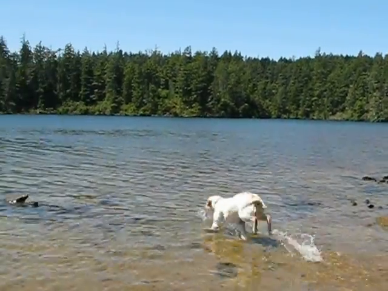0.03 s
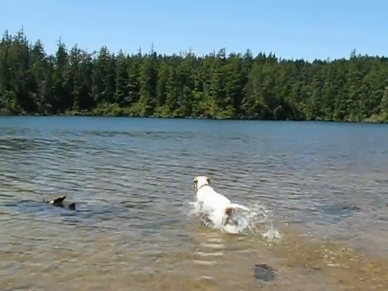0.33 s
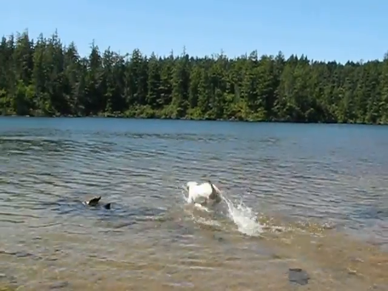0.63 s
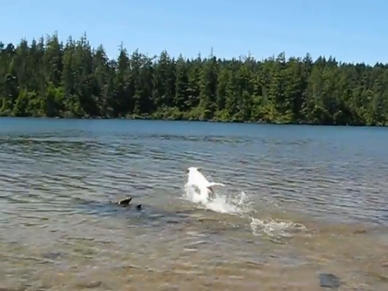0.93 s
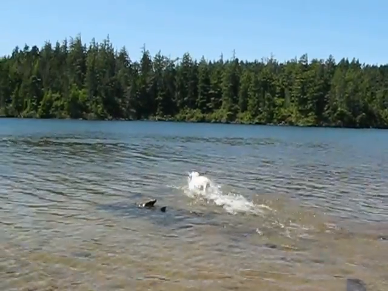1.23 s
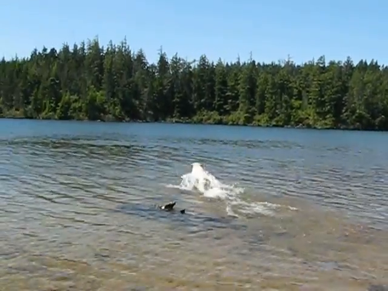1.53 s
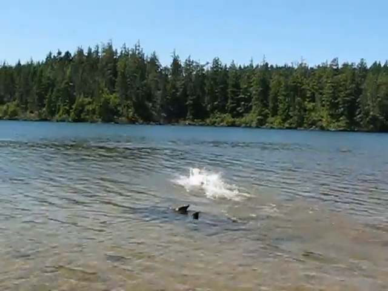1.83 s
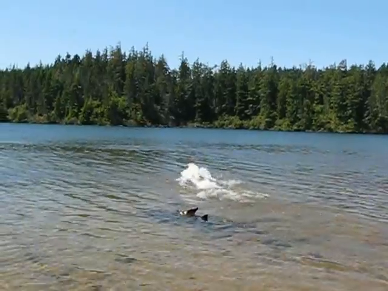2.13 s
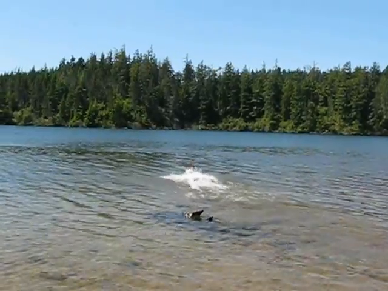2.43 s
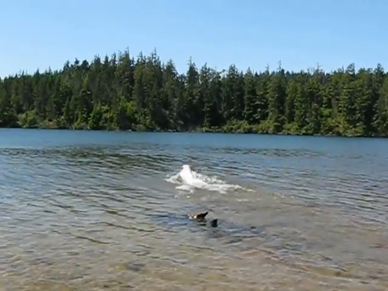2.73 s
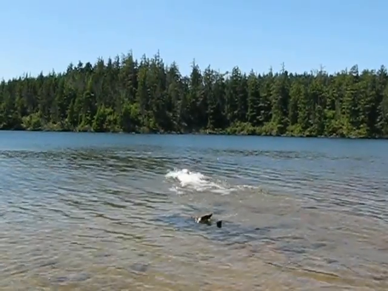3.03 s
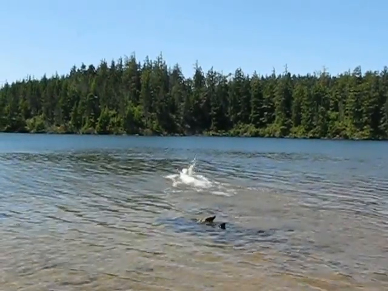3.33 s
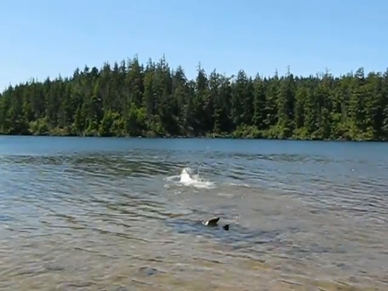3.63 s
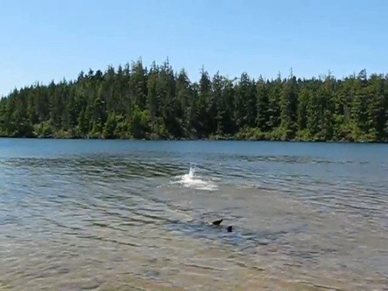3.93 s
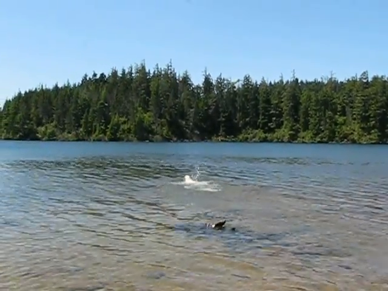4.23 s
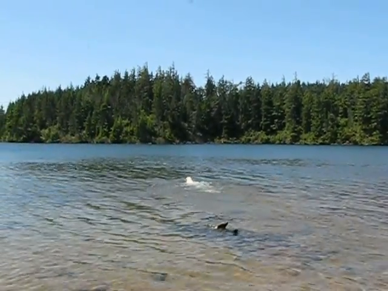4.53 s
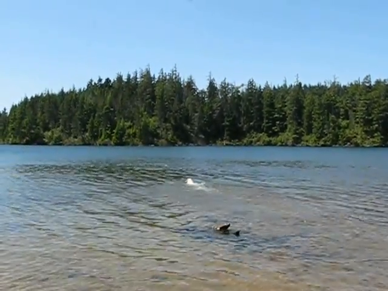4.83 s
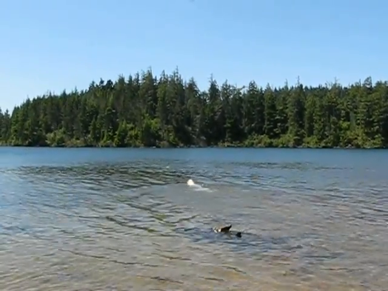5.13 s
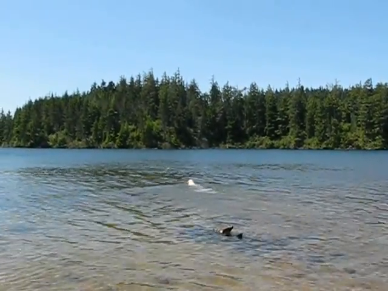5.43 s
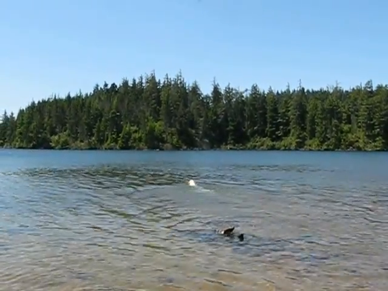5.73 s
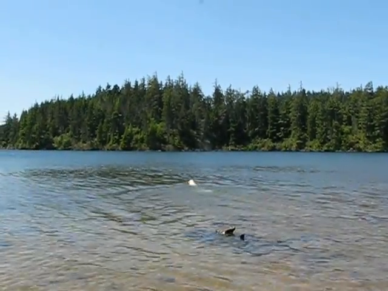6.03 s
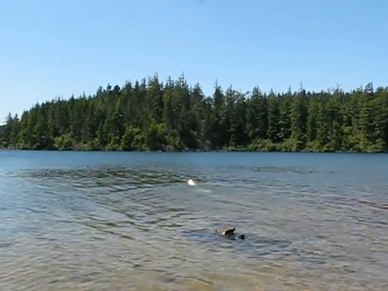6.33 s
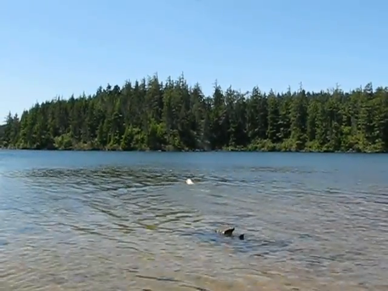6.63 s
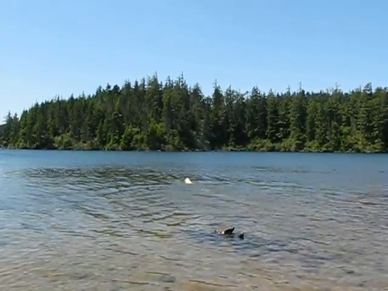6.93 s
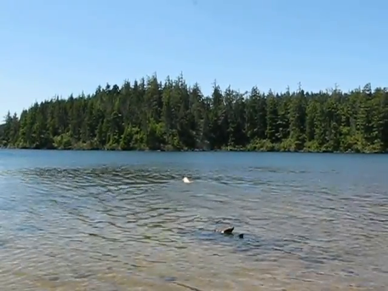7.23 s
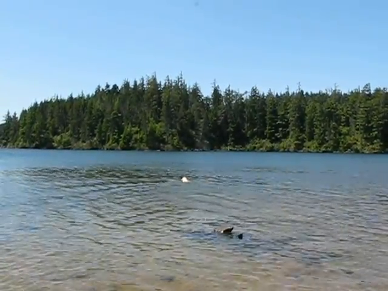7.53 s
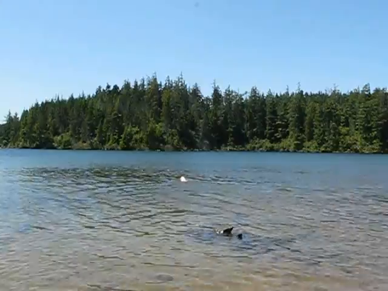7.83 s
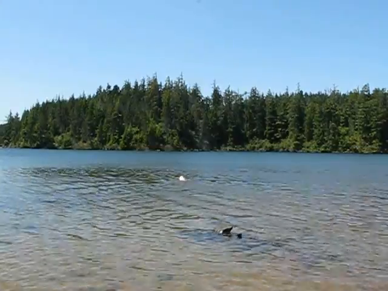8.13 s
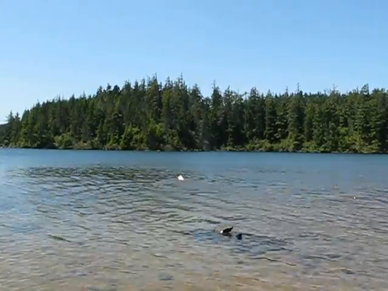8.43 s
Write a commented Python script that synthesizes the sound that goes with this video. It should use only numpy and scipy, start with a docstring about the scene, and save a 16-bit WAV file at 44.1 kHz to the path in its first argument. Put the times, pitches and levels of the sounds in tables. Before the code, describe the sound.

From the start, a dog gallops through shallow lake water close by: quick, sharp splashes, hollow gulps from its plunging legs and spray pattering back down. These are loudest and densest in the first two seconds. A few low gusts buffet the microphone until about 2.5 seconds, over a light steady rumble. From about 2 to 4 seconds the splashes become sparser and duller, with more churning and sloshing as the dog moves deeper and farther off. Some last small splashes and drips follow, and the dog fades out by about 5 seconds. Wind hisses smoothly in the trees throughout. A faint, low engine drone from far away wavers underneath and is more noticeable from 4 seconds on. Until the end at about 8.5 seconds, wind and engine continue, with a faint fizz and scattered ticks of ripples at the shore. The space is open, without echo.

```python
"""A dog runs into a lake

A dog gallops into the shallows, wades deeper and swims away. Each leg traps air that resonates with
a gulp, churns the water and flings up spray, which rains back as tiny bubbles, duller with distance.
Wind hisses in the forest and buffets the microphone; a far engine drones; ripples tick at the shore."""
import sys
import numpy as np
from scipy import signal
from scipy.io import wavfile

SR = 44100
rng = np.random.default_rng(int(sys.argv[2]) if len(sys.argv) > 2 else 0)


def pcm_store(signal):
    """Save signal as 16-bit PCM."""
    levels = np.round(np.clip(np.atleast_2d(signal), -1, 1) * 32767)
    wavfile.write(sys.argv[1], SR, levels.astype(np.int16).T)


N = 378641

# air cavities punched by the legs: t/s, duration/s, relative level/dB, f/Hz
PLUNGES = [(0.08, 0.022, -27.5, 565), (0.159, 0.019, -28.5, 473), (0.221, .007, -25, 470),
           (0.23, 0.01, -15.5, 510), (0.261, .0034, -17, 634), (0.395, .0085, -23, 414),
           (0.506, .009, -17, 390), (0.532, .0077, -23.5, 456), (0.595, 0.0029, -14.5, 410),
           (0.64, .012, -24, 605), (0.65, .008, -19.5, 610), (0.66, 0.009, -15, 420),
           (.686, .008, -26, 520), (0.801, 0.023, -21.5, 730), (0.829, .01, -18, 427),
           (0.859, 0.0097, -19.5, 450), (0.881, 0.015, -18, 580), (.903, 0.015, -24.5, 505),
           (0.983, 0.022, -18.5, 462), (1.021, 0.025, -29, 510), (1.205, 0.0083, -22.5, 406),
           (1.272, 0.022, -26, 436), (1.329, 0.012, -23, 640), (1.348, 0.036, -28, 187),
           (1.386, 0.025, -25, 350), (1.412, .028, -21.5, 440), (1.45, .028, -21.5, 610),
           (1.494, 0.039, -26.5, 456), (1.731, 0.014, -24, 400), (1.776, 0.017, -19, 550),
           (1.803, 0.017, -20.5, 450), (1.833, 0.035, -29, 620), (1.866, 0.0181, -27.5, 427),
           (1.921, .025, -22.5, 485), (1.962, 0.038, -25, 545), (2.07, .07, -28.5, 470),
           (2.245, 0.056, -30.5, 540), (2.483, 0.035, -27, 470), (2.551, .026, -21, 560),
           (2.89, 0.056, -29, 420), (2.956, 0.027, -34, 560), (3, .025, -29, 580), (3.036, .035, -29, 700),
           (3.179, .0072, -23, 670), (3.279, .02, -23, 400), (3.292, 0.013, -25, 580),
           (3.352, .008, -28.5, 487), (3.904, 0.0032, -18, 426), (3.914, .005, -17.5, 420),
           (3.92, .009, -30, 580)]
# spectrum of the bubbles made by falling drops: f/Hz, relative density level/dB
SPRAY_SPECTRUM = [(700, -5), (1000, 1.5), (1400, 1.5), (1900, 0.5), (2800, 2.5), (3600, -3.5), (4800, -4),
                  (6500, -10.5)]
FULL_PLUNGE_S = 0.022   # a plunge this long moves a full load of water


def from_db(db):
    """Amplitude ratio of a level in decibels."""
    return 10 ** (np.asarray(db) / 20)


def unit_rms(x):
    """Normalisation to an rms of 1."""
    return x / np.sqrt(np.mean(x ** 2) + 1e-20)


def in_time(curve):
    """Linear interpolation of a level curve at every sample."""
    return np.interp(np.arange(N) / SR, *np.transpose(curve))


def at_hz(spectrum, hz):
    """Interpolation of a spectrum on a logarithmic frequency axis."""
    frequencies, levels = np.transpose(spectrum)
    return np.interp(np.log(hz), np.log(frequencies), levels)


def drift(corner_hz):
    """Low-pass filtered noise: a slow random fluctuation of rms 1."""
    step, settling = 40, 2000
    pole = np.exp(-2 * np.pi * corner_hz * step / SR)
    white = rng.standard_normal(N // step + settling + 2)
    slow = signal.lfilter([1], [1, -2 * pole, pole * pole], white)[settling:]
    return np.interp(np.arange(N) / step, np.arange(len(slow)), unit_rms(slow))


def add(out, start_s, sound):
    """Superposition of a sound from a given time on."""
    i = max(int(start_s * SR), 0)
    out[i:i + len(sound)] += sound[:max(N - i, 0)]


def butterworth(x, order, hz, kind):
    """Filtering with a maximally flat passband."""
    return signal.sosfilt(signal.butter(order, hz, kind, fs=SR, output="sos"), x)


def bubble_cloud(spectrum, per_s, cycles, size_db, clump_db, bands, tilt_db=0):
    """Random impulses excite damped bubble resonators; tilt_db is the slope per octave about 3 kHz."""
    out, power, common_drift = 0, 0, drift(25)
    for hz in np.geomspace(spectrum[0][0], spectrum[-1][0], bands):
        births = np.flatnonzero(rng.random(N) < per_s / bands / SR)
        sizes = np.minimum(rng.exponential(1, N)[births], 4)
        kicks = np.full(N, 1e-18)
        kicks[births] = from_db(size_db * sizes) * np.sign(rng.standard_normal(N)[births])
        pole = from_db(-60 * hz / (cycles * SR))
        rings = signal.lfilter([1, 0, -1], [1, -2 * pole * np.cos(2 * np.pi * hz / SR), pole**2], kicks)
        rings = butterworth(rings, 1, [hz / 2, min(hz * 2, SR / 2 - 1)], "band")
        gain = from_db(at_hz(spectrum, hz)) * np.sqrt(hz)
        tilt = from_db(tilt_db * np.log2(hz / 3000))
        clumping = from_db(clump_db * (0.11 * common_drift + drift(25)))
        out = out + gain * tilt * clumping * unit_rms(rings)
        power += gain ** 2
    return out / np.sqrt(power)


def aftermath(level_db, peak_s):
    """Incoherent sources add in power: the water stirred by each plunge swells, then settles."""
    power, age = np.zeros(N), np.arange(SR) / SR / peak_s
    swell = age * np.exp(1 - age)
    for start, duration, plunge_db, _ in PLUNGES:
        add(power, start, from_db(plunge_db + level_db) ** 2 * duration / FULL_PLUNGE_S * swell)
    return power


def wake():
    """Bubble resonance in churned water and falling spray; the spray loses treble with distance."""
    # spray kept in the air by the dog: t/s, relative level/dB
    airborne = [(0, -32), (.09, -33.5), (.135, -41), (.175, -34.5), (.21, -36), (.26, -33.5), (.7, -31.5),
                (.86, -38), (1.04, -32), (1.14, -34.5), (1.28, -31.5), (1.52, -37.5), (1.74, -30.5),
                (2.1, -38), (2.53, -34), (2.7, -43), (3.14, -37.5), (3.52, -47), (3.76, -41.5), (4.08, -48),
                (4.62, -47.5), (5.2, -73)]
    # water sloshing round the dog: t/s, level/dB
    slosh = [(0, -43), (.19, -43), (.3, -31.5), (.55, -35.5), (.75, -39.5), (.9, -29.5), (1.15, -36.5),
             (1.35, -32), (1.57, -37.5), (1.67, -28.5), (1.76, -37), (1.9, -31), (2.2, -36), (2.36, -30),
             (2.56, -34), (2.68, -37), (3.12, -33.5), (3.5, -37.5), (3.9, -42.5), (4.6, -42.5), (5.2, -58)]
    # bubbles in the churned water: f/Hz, relative density level/dB
    churn_spectrum = [(200, -12.5), (290, -10), (400, 2.5), (600, -0.5), (840, -2.5), (1000, -9.5),
                      (1400, -13), (2200, -15.5)]
    start_m, away_m_per_s = 3.87, 2.7
    distance_doublings = np.log2(1 + away_m_per_s * np.arange(N) / SR / start_m)
    airborne_db = in_time(airborne)
    boil = aftermath(level_db=-9, peak_s=0.01)   # each cavity breaks up into bubbles
    fallback = aftermath(level_db=-23.5, peak_s=0.071)   # the flung drops land later
    churn_gain = np.sqrt(from_db(in_time(slosh)) ** 2 + boil)
    spray_gain = np.sqrt(from_db(airborne_db - 0.1) ** 2 + fallback)
    churn = bubble_cloud(churn_spectrum, per_s=900, cycles=15.4, size_db=0.5, clump_db=-0.5, bands=24)
    spray = bubble_cloud(SPRAY_SPECTRUM, per_s=7000, cycles=13, size_db=2.16, clump_db=0.76, bands=20,
                         tilt_db=2 - 2 * distance_doublings)
    large_drops = bubble_cloud(SPRAY_SPECTRUM, per_s=450, cycles=18, size_db=0.5, clump_db=1, bands=27,
                               tilt_db=4.5)
    return churn_gain * churn + spray_gain * spray + from_db(airborne_db - 8.5) * large_drops


def air_noise(spectrum, flutter_db, bands):
    """Noise bands under independent random amplitude modulation; rms 1."""
    out, edges = 0, np.geomspace(spectrum[0][0], spectrum[-1][0], bands + 1)
    white = rng.standard_normal((2, N))
    for k, (low, high) in enumerate(zip(edges, edges[1:])):
        band = butterworth(white[k % 2], 2, [low, high], "band")
        out = out + band * from_db(at_hz(spectrum, np.sqrt(low * high)) + flutter_db * drift(9.7))
    return unit_rms(out)


def forest_wind():
    """Turbulent flow through the trees radiates a smooth broadband hiss."""
    # strength of the breeze: t/s, relative level/dB
    breeze = [(0, -33.5), (.15, -46.5), (.6, -36), (1.15, -36), (1.6, -31.5), (3.5, -33.5), (4.4, -36.5),
              (4.9, -34.5), (5.4, -33), (6.0, -34), (6.8, -35), (7.4, -35), (8.0, -35.5), (8.59, -37)]
    # wind in the trees: f/Hz, relative density level/dB
    spectrum = [(30, -15.5), (60, -2), (100, 0.5), (200, 1.5), (310, -0.5), (450, 1), (700, 1.5),
                (1020, -3), (1480, -3), (1950, -10.5), (2750, -11.5), (3500, -19), (4600, -22.5),
                (6500, -30)]
    return from_db(in_time(breeze) - 1.07) * air_noise(spectrum, flutter_db=0.28, bands=26)


def microphone_wind():
    """Turbulent pressure on the microphone rumbles steadily; each gust swells it and adds a deep surge."""
    # gusts: centre t/s, duration/s, relative buffet level/dB, surge level/dB
    gusts = [(.115, 0.14, -35.5, -50), (0.234, 0.16, -42, -54), (0.52, 0.045, -41, -38),
             (0.947, 0.2, -51, -52), (1.234, 0.091, -50, -39), (1.342, 0.15, -39, -42),
             (1.878, 0.3, -50, -46), (2.517, 0.051, -41, -49)]
    # buffeting: f/Hz, relative density level/dB
    buffet_spectrum = [(25, -10.5), (45, -3.5), (65, 0), (110, 1.5), (220, -7), (400, -23.5)]
    # deep surge: f/Hz, relative density level/dB
    surge_spectrum = [(34, -8), (50, 8), (68, -6), (90, -13.5)]
    buffet_gain, surge_gain = np.full(N, from_db(-52.5)), np.zeros(N)
    for centre, duration, buffet_db, surge_db in gusts:
        swell = np.sqrt(np.hanning(int(duration * SR)))
        add(buffet_gain, centre - duration / 2, from_db(buffet_db + 1) * swell)
        add(surge_gain, centre - duration / 2, from_db(surge_db) * swell)
    surge = surge_gain * air_noise(surge_spectrum, flutter_db=3, bands=3)
    return surge + buffet_gain * air_noise(buffet_spectrum, flutter_db=2, bands=6)


def wavelets():
    """Heavily damped bubble resonances merge into a faint fizz at the shore."""
    # strength of the fizz: t/s, level/dB
    lapping = [(0, -43.5), (4.0, -52.5), (4.9, -53), (5.7, -48), (6.5, -51.5), (7.4, -53.5), (8.59, -64)]
    fizz = bubble_cloud(SPRAY_SPECTRUM, per_s=3200, cycles=5, size_db=2, clump_db=3, bands=12,
                        tilt_db=-5.5)
    return from_db(in_time(lapping)) * fizz


def far_engine():
    """Periodic firing gives harmonics of the cycle rate over exhaust noise, fading across the lake."""
    # firing tone: t/s, level/dB
    firing_tone = [(.6, -50.5), (1.1, -51), (2.3, -46), (2.75, -50.5), (3.0, -46), (3.7, -44.5),
                   (3.85, -52.5), (4.2, -41), (4.65, -38), (4.92, -44), (5.12, -38), (5.5, -40.5),
                   (5.72, -51.5), (5.85, -43.5), (6.2, -44.5), (6.35, -49), (6.85, -50), (7.02, -38.5),
                   (7.25, -40.5), (7.35, -43.5), (7.7, -41), (8.04, -38), (8.16, -56.5), (8.28, -40.5),
                   (8.59, -47)]
    # weaker harmonics from uneven firing: multiple of the cycle rate, mean level/dB
    weak_orders = [(3, -62.5), (5, -53.5), (6, -58), (11, -54.5), (13, -54.5), (16, -56)]
    # exhaust rumble: f/Hz, relative density level/dB
    exhaust = [(55, -11.5), (78, 1.5), (105, -2), (170, -5.5), (230, -1), (320, -11)]
    cycle_hz, firings_per_cycle = 16.35, 8
    wander, flutter_db, rumble_db = 0.004, 0.9, -54
    firing_db = in_time(firing_tone)
    fading_db = 0.55 * (firing_db - firing_db.mean())   # rumble and weak orders fade less deeply
    phase = 2 * np.pi * cycle_hz * np.cumsum(1 + wander * drift(4.16)) / SR
    lines = [(firings_per_cycle, firing_db)] + [(order, db + fading_db) for order, db in weak_orders]
    hum = sum(from_db(db + flutter_db * drift(4.1)) * unit_rms(np.sin(order * phase))
              for order, db in lines)
    return hum + from_db(rumble_db + fading_db) * air_noise(exhaust, flutter_db=-1.5, bands=5)


def bubble(t, hz, cycles, rise):
    """A damped oscillator, 60 dB down after cycles / hz seconds; its pitch rises near the surface."""
    age = np.maximum(t, 0) * hz / cycles
    phase = 2 * np.pi * cycles * age * (1 + rise * np.minimum(age, 1))
    return np.sin(phase) * from_db(-60 * age)


def splashes(impacts, per_s, max_bubbles, octaves_below, octaves_above, cycles, ring_growth, rise, lag):
    """Air entrainment: each impact sheds a cluster of bubbles, the first on time and on pitch."""
    out, t = np.zeros(N), np.arange(SR // 8) / SR
    for start, duration, level_db, hz in impacts:
        count = int(np.clip(1.5 + per_s * duration, 2, max_bubbles))
        jitter, pitch, strength, polarity = rng.random((4, max_bubbles))[:, :count, None]
        index = np.arange(count)[:, None]
        birth = (index + jitter * (index > 0) / 2) / count * lag   # in durations of the impact
        weight = (0.6 + strength) * np.sign(polarity - 0.5) / (1 + birth ** 4)
        octaves = (2 * pitch - 1) * np.where(pitch < 0.5, octaves_below, octaves_above) * (index > 0)
        ring_cycles = cycles * (duration / FULL_PLUNGE_S) ** ring_growth   # a brief stab damps sooner
        rings = weight * bubble(t - birth * duration, hz * 2 ** octaves, ring_cycles, rise)
        # bubbles radiate almost nothing below their resonance
        cluster = butterworth(rings.sum(axis=0), 2, 0.57 * hz * 2 ** -octaves_below, "high")
        rms = np.sqrt(np.mean(cluster[t < duration + 0.003] ** 2) + 1e-12)
        add(out, start, cluster / rms * from_db(level_db))
    return out


def slaps():
    """Flung sheets of water land and trap small bubbles, which resonate at high frequencies."""
    # sheets hitting the surface: t/s, duration/s, relative level/dB, f/Hz
    landings = [(.012, 0.019, -22.5, 2600), (.038, 0.019, -21.5, 1360), (.081, 0.019, -22.5, 3220),
                (.163, .008, -22, 1900), (.234, 0.02, -21.5, 3400), (.264, 0.0052, -17, 2180),
                (.278, 0.0074, -24.5, 3000), (.323, 0.0071, -32, 2820), (.354, 0.036, -27.5, 2890),
                (.432, 0.0067, -25, 3430), (.449, 0.0044, -24, 2600), (.473, 0.011, -25.5, 2570),
                (.547, .004, -32, 4300), (.596, .004, -23, 1300), (.654, 0.026, -23, 1600),
                (.664, .025, -29, 4300), (.717, .006, -26, 3100), (.733, 0.008, -19, 3600),
                (.785, 0.035, -23.5, 1750), (.833, 0.0087, -22.5, 1600), (.865, 0.051, -30, 1300),
                (.975, .025, -31, 1700), (1.068, .014, -27, 3000), (1.164, .007, -25, 2600),
                (1.25, .004, -24, 4000), (1.262, 0.041, -23, 2300), (1.33, 0.017, -26.5, 2080),
                (1.388, 0.0064, -36, 2470), (1.43, 0.045, -40, 1400), (1.61, .025, -25.5, 1800),
                (1.731, 0.02, -19, 1690), (1.901, 0.0027, -19.5, 2860), (1.975, 0.029, -31, 1400),
                (2.31, 0.059, -32, 1600), (2.39, 0.055, -32, 3400), (3.401, .004, -29, 2800),
                (3.725, 0.044, -31.5, 1970), (3.775, 0.014, -30, 2300), (3.938, .014, -26.5, 2200),
                (4.015, .008, -33, 2580), (4.412, .016, -36, 2200), (4.556, .014, -38, 2300)]
    return from_db(-6.5) * splashes(landings, per_s=2900, max_bubbles=90, octaves_below=0.7,
                                    octaves_above=0.78, cycles=7, ring_growth=0.15, rise=0.23, lag=1.3)


def gulps():
    """Plunging legs trap large air cavities, which resonate at low frequencies."""
    return from_db(-5) * splashes(PLUNGES, per_s=450, max_bubbles=40, octaves_below=0.35,
                                  octaves_above=0.62, cycles=11, ring_growth=0.56, rise=0.26, lag=1.7)


def drips():
    """A drop's impact transient ticks; a trapped bubble resonates amid a fine spatter."""
    # single drops and ripples: t/s, relative peak level/dB, f/Hz, decay time/cycles
    drops = [(.093, -12, 5360, 17), (.549, -16.5, 4960, 22), (1.069, -22, 2830, 62), (1.085, -14, 3000, 14),
             (3.356, -28.5, 3300, 20), (3.785, -28, 2100, 18), (3.856, -37, 4300, 20),
             (3.918, -26, 5400, 15), (3.956, -25, 3080, 30), (3.979, -26.5, 4180, 20),
             (3.99, -28, 3400, 22), (4.204, -26, 5000, 12), (4.227, -25, 3600, 12), (4.284, -28, 5300, 16),
             (4.415, -28, 1970, 21), (4.516, -30, 4800, 12), (4.563, -27, 2100, 10), (4.573, -29, 3700, 14),
             (4.621, -26, 3500, 17), (4.648, -33, 2660, 39), (4.652, -32, 5400, 16), (5.712, -39, 4200, 18),
             (6.246, -31, 4500, 15), (6.872, -35, 3020, 45), (6.881, -31.5, 2330, 59),
             (6.968, -35, 3580, 18), (7.053, -31, 4730, 11), (7.216, -35, 3340, 16), (7.215, -28, 2250, 20),
             (7.368, -36, 3450, 40), (7.548, -33, 2250, 28)]
    tick_decay_s, spatter_decay_s = 0.00082, 0.0097
    out, spatter_gain, t = np.zeros(N), np.zeros(N), np.arange(SR // 20) / SR
    for start, peak_db, hz, cycles in drops:
        hardness = min(1, 18 / cycles)   # long-ringing bubbles start softly
        tick = 0.21 * hardness * rng.standard_normal(len(t)) * np.exp(-t / tick_decay_s)
        add(out, start - 0.001, from_db(peak_db + 2.5) * (bubble(t, hz, cycles, rise=0.048) + tick))
        add(spatter_gain, start - 0.002, hardness * from_db(peak_db - 19) * np.exp(-t / spatter_decay_s))
    spatter = bubble_cloud(SPRAY_SPECTRUM, per_s=2000, cycles=9.3, size_db=4, clump_db=2, bands=12,
                           tilt_db=7)
    return out + spatter_gain * spatter


def near_reflection(x, delay_s, gain):
    """Comb filtering: interference with a weak inverted reflection gives a slightly hollow colour."""
    samples = np.arange(N)
    return x - gain * np.interp(samples - delay_s * SR, samples, x, left=0)


def scene():
    """Superposition over open water: no reverberation, only one reflection of the dog's splashing."""
    dog = near_reflection(wake() + slaps() + gulps(), delay_s=0.00305, gain=0.12)
    return (dog + forest_wind() + microphone_wind() + wavelets() + far_engine() + drips())[None]


def record(dry):
    """Overall tone: mild resonances, then low-pass filters soften the treble and cut it above 7 kHz."""
    # peaks and a dip of the microphone housing: f/Hz, bandwidth/Hz, gain/dB
    housing = [(2860, 300, 0.5), (3450, 290, -1.3), (4230, 1400, 1.5)]
    for hz, width, db in housing:
        resonance = signal.lfilter(*signal.iirpeak(hz, hz / width, fs=SR), dry)
        dry = dry + (from_db(db) - 1) * resonance
    roll_off = signal.firwin(61, 5950, window=("kaiser", 5.5), fs=SR)
    softened = signal.convolve(dry, roll_off[None], "same")
    return butterworth(softened, order=14, hz=7130, kind="low")


dry = scene()
out = record(dry)
pcm_store(out)
```